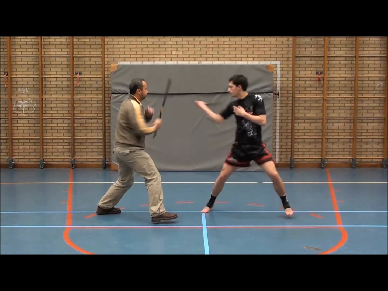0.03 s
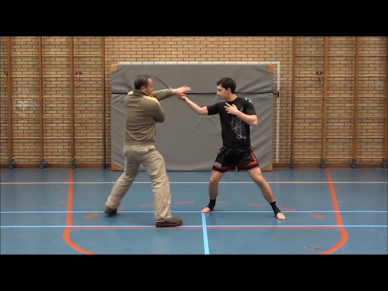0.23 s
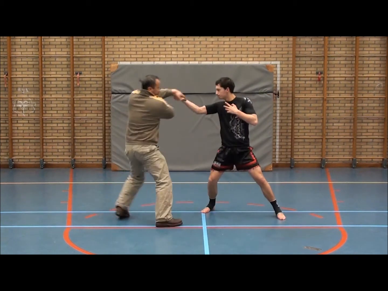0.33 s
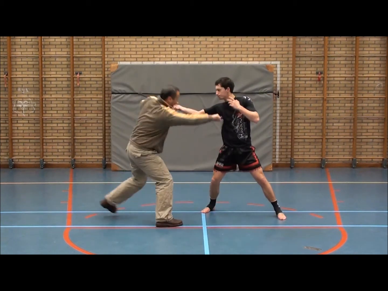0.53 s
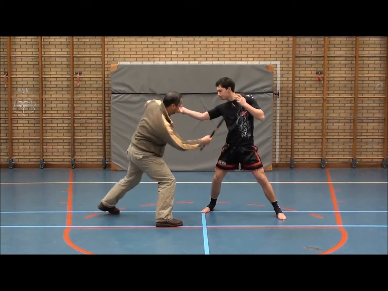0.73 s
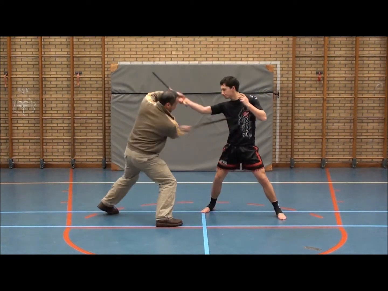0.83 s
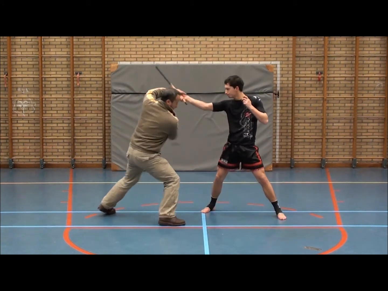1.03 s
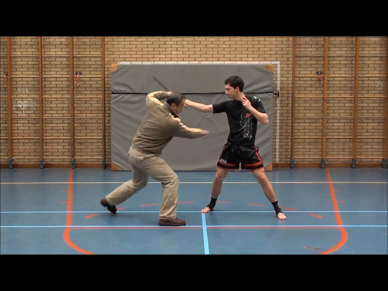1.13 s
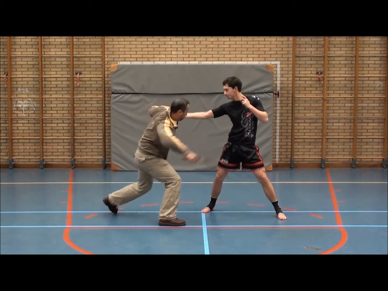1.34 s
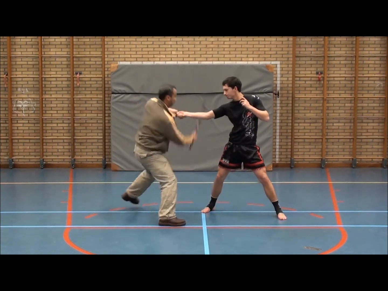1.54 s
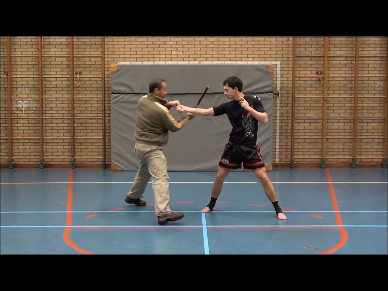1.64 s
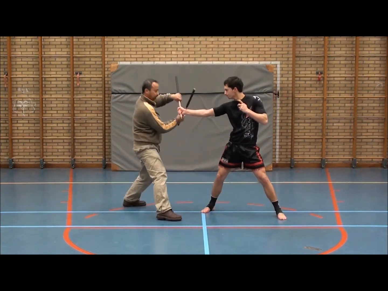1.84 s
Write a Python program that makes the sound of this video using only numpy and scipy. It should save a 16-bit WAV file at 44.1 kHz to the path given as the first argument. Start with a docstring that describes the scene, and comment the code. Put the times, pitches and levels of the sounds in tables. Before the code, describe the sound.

A very loud double crack of wooden sticks comes early, ringing in a large reverberant sports hall, followed by three softer slaps on arm and body, footfalls, cloth rustle and faint swishes, heard from some distance.

```python
"""In a large sports hall, two people spar with short wooden sticks.
The sticks clash once, very loudly, with a rebound: a contact impulse shaped by a crack and the wood's resonances.
Lighter slaps on arm and body follow, between footfalls on the sprung floor, the rustle of clothes and
the rush of swung sticks: shaped contact bursts and swelling noise. Steady ventilation noise lies beneath.
The hall rings for over a second, and a limiter flattens the start of the clash."""
import sys
import numpy as np
from scipy import signal
from scipy.fft import rfft, irfft, next_fast_len
from scipy.io import wavfile
from scipy.ndimage import uniform_filter1d, minimum_filter1d, map_coordinates

SR = 44100
rng = np.random.default_rng(int(sys.argv[2]) if len(sys.argv) > 2 else 0)


def wrap_up_sound(samples):
    """Save the sound to the file named by the first command line argument, as 16-bit audio."""
    columns = np.atleast_2d(samples).T
    # keep every value between -1 and 1, then stretch to whole-number steps
    tamed = np.clip(columns, -1, 1)
    steps = np.round(tamed * 32767).astype(np.int16)
    wavfile.write(sys.argv[1], SR, steps)


N = 83790
T = np.arange(N) / SR
M = next_fast_len(2 * N)  # transform length, padded against wrap-around
HZ = np.fft.rfftfreq(M, 1 / SR)


def amp(db):
    """Level law: decibels to amplitude gain."""
    return 10 ** (np.asarray(db) / 20)


def unit(x):
    """Normalization: scale to an rms of 1."""
    return x / np.sqrt(np.mean(x ** 2) + 1e-20)


def along(points, hz):
    """Interpolate (freq_hz, value) points linearly on a logarithmic frequency axis."""
    f, v = np.transpose(points)
    return np.interp(np.log(hz + 1), np.log(f + 1), v)


def filtered(x, response):
    """Linear filtering: multiply the spectrum of x by a frequency response."""
    return irfft(rfft(x, M) * response, M)[..., :N]


def colour(*parts):
    """Minimum phase: a causal response from (spectrum, gain_db) parts added in power, by cepstral folding."""
    power = sum(amp(along(points, HZ) + db) ** 2 for points, db in parts)
    cepstrum = irfft(np.log(power + 1e-14) / 2, M)
    cepstrum[1:M // 2] *= 2
    cepstrum[M // 2 + 1:] = 0
    return np.exp(rfft(cepstrum))


def delayed(x, s):
    """Shift theorem: a linear phase delays x by s seconds, to the nearest sample."""
    return filtered(x, np.exp(-2j * np.pi * HZ * round(s * SR) / SR))


def hump(hz, octaves):
    """Broad resonance: a level curve about 4 dB down at the given octaves from its centre."""
    away = np.log2(np.maximum(HZ, 1) / hz) / (2 * octaves)
    return np.transpose([HZ, -2 * 20 * np.log10(1 + away ** 2)])


def swell(s, width_s, db):
    """Gaussian envelope: peak at s, standard deviation width_s, peak level db."""
    return amp(db) * np.exp(-((T - s) / width_s) ** 2 / 2)


def diffuse():
    """Diffuse field: white stereo noise whose left-right coherence depends on frequency."""
    # coherence of two close microphones: freq_hz, likeness (0 to 1)
    likeness = [(60, .997), (250, 0.99), (500, 0.93), (1000, 0.88), (2500, 0.9), (5000, 0.86), (9000, 0.97)]
    # with mid as cos(turn) and side as sin(turn), the coherence is cos(2 turn)
    turn = np.arccos(np.clip(along(likeness, HZ), 0, 1)) / 2
    mid, side = filtered(rng.standard_normal((2, N)), np.array([np.cos(turn), np.sin(turn)]))
    return np.array([mid + side, mid - side])


def rush(spectrum):
    """Coloured noise: a stereo diffuse field of rms 1 with the given spectrum."""
    return unit(filtered(diffuse(), amp(along(spectrum, HZ))))


def burst(length_s):
    """Impulsive contact: dying noise with its spectrum made even, scaled to unit energy."""
    t = T[:SR // 4]
    noise = rng.standard_normal(len(t)) * np.exp(-t / length_s)
    spectrum = rfft(noise, 2 * len(t))
    even = irfft(spectrum / (abs(spectrum) + 1e-12))[:len(t)]
    x = even * np.exp(-(t / (4 * length_s)) ** 2)
    return x / np.linalg.norm(x)


def in_hall(contact_s, wet_db, echo_db):
    """Room acoustics: direct sound, discrete reflections, then an exponentially decaying diffuse tail."""
    # reverberation time: freq_hz, t60_s
    decay_times = [(100, 0.65), (400, 1.12), (1500, 1.286), (2500, 1.103), (4200, 0.96), (6000, 0.82),
                   (8000, 0.6), (11000, 0.35), (15000, 0.29)]
    # echoes off the ceiling and walls: delay_s, level_db (before echo_db is added)
    hall_echoes = [(0.0118, -16), (0.0214, -1), (0.0258, -4), (0.036, -2)]
    bounce_s, bounce_db = .0021, 2  # reflection off the floor
    gap_s, build_s = 0.0034, 0.013  # quiet before the tail, time constant of its rise

    hz, t, bands = signal.stft(diffuse(), SR, nperseg=256)
    decay = amp(-60 * t / along(decay_times, hz)[:, None])
    tail = signal.istft(bands * decay, SR, nperseg=256)[1][:, :N]
    tail = tail * (1 - np.exp(-np.maximum(T - gap_s, 0) / build_s))

    paths = [(0, 0), (bounce_s, bounce_db)]
    paths += [(s, db + echo_db) for s, db in hall_echoes]
    early = sum(amp(db) * np.pad(burst(contact_s), (round(s * SR), N))[:N] for s, db in paths)
    return early + amp(wet_db) * tail / np.linalg.norm(tail[0])


def air(level_db=-45.5):
    """Stationary noise: ventilation and hiss with a fixed spectrum."""
    # relative spectrum: freq_hz, level_db
    air_curve = [(25, -0.5), (60, -5.5), (120, 1), (250, 1), (500, 0.5), (1000, -8.5), (2000, -11),
                 (4000, -15.5), (8000, -10.5), (11000, -19), (16000, -19.5)]
    return amp(level_db) * rush(air_curve)


def clothes(grain_db=3, grain_rate_hz=400):
    """Stick-slip friction: cloth and shoes rub in small catches, noise with a randomly grained level."""
    # rubs: peak_s, width_s, level_db
    rubs = [(.02, 0.024, -40.5), (.15, 0.055, -38.5), (.78, 0.076, -37), (1.82, 0.15, -42.5)]
    # relative spectrum of the rubbing: freq_hz, level_db
    cloth_curve = [(200, -6.5), (1500, 0.5), (2800, -1), (4800, -0.5), (8000, -1.5), (10500, -15),
                   (16000, -18)]
    grain = map_coordinates(rng.standard_normal(N), [T * grain_rate_hz], order=1)
    envelope = sum(swell(*row) for row in rubs)
    return envelope * unit(amp(grain_db * grain)) * rush(cloth_curve)


def feet(level_db=10):
    """Forced vibration: each rolling foot makes the sprung floor boom, while the sole ticks."""
    # footfalls: start_s, level_db (before the common gain), tick_db (sole), roll_s, deep_db (boom), hall_db
    footfalls = [(0.1176, -9.5, -21, 0.0063, -25, -9), (.131, -9, -35, 0.027, 1.5, -3.5),
                 (0.162, -15.5, -33, 0.011, 3, -16), (.181, -13.5, -44, 0.011, 3, -16),
                 (.195, -16, -31, 0.011, 7.5, -11), (.402, -14.5, -34, .015, -5, -1),
                 (.744, -17, -22, 0.027, -2, 2.5), (.813, -20, -32, .02, -3, -2),
                 (1.167, -20, -19.5, 0.011, -11, -3), (1.716, -13, -34, 0.0068, -9, 1),
                 (1.83, -20.5, -18.5, 0.013, 2.5, 3.5)]
    # relative response of the sprung floor: freq_hz, level_db
    floor_curve = [(30, -25), (100, -7), (150, 5), (215, 15.5), (330, 5), (480, -6), (900, -18.5),
                   (3000, -24)]
    # the floor's deep boom under full weight: freq_hz, level_db (before deep_db is added)
    deep_curve = [(20, -25), (35, 8), (62, 8), (90, 5), (130, 8), (200, -10), (500, -35), (2000, -70)]
    # relative spectrum of the sole's tick: freq_hz, level_db
    sole_curve = [(300, -6), (1500, -3), (4000, 12.5), (8000, 8.5), (11000, 2), (16000, -22)]
    sole_lag_s = 0.0057  # the sole lands after the heel
    out = np.zeros((2, N))
    for s, db, tick_db, roll_s, deep_db, hall_db in footfalls:
        roll = in_hall(contact_s=roll_s / 2, wet_db=hall_db, echo_db=hall_db - 1.5)
        boom = filtered(roll, colour((floor_curve, 0), (deep_curve, deep_db)))
        tap = in_hall(contact_s=0.00023, wet_db=1.5, echo_db=1)
        tick = amp(tick_db) * filtered(tap, amp(along(sole_curve, HZ)))
        out += amp(db + level_db) * (delayed(boom, s) + delayed(tick, s + sole_lag_s))
    return out


def wood(ring_db=-0.5):
    """Modal resonance: the sticks' modes added in power as a spectrum of freq_hz, level_db."""
    # modes: freq_hz, width_hz (offset at which a mode is 7 dB down), level_db (before ring_db is added)
    modes = [(1200, 120, -5.5), (1630, 220, 0.5), (2055, 270, -0.5), (2306, 180, 1.5), (2704, 130, -3),
             (2998, 180, 4), (3630, 190, 1), (4166, 220, 4.5), (4410, 160, 0), (4830, 410, -0.5),
             (5640, 115, -0.5), (6000, 140, 0), (6550, 180, -13.5), (7500, 520, -5.5)]
    power = sum(amp(db) ** 2 / (1 + (1.114 * (HZ - hz) / width) ** 2) ** 2 for hz, width, db in modes)
    return np.transpose([HZ, 10 * np.log10(power) + ring_db])


def sticks(level_db=17):
    """Impact excitation: the clash and its rebound are each a crack and a short ring of the wood."""
    # contacts of stick on stick: start_s, level_db (before the common gain)
    contacts = [(0.2306, -0.5), (0.2415, 0.5)]
    # relative spectrum of the contact's crack: freq_hz, level_db
    crack_curve = [(60, -27), (250, -28), (460, -13.5), (900, -16.5), (1500, -18), (3000, -2), (5000, -7),
                   (7800, -8), (10000, -21), (13000, -37), (16000, -35)]
    tone = colour((crack_curve, 0), (wood(), 0))
    out = np.zeros((2, N))
    for s, db in contacts:
        hit = filtered(in_hall(contact_s=0.00088, wet_db=15, echo_db=-1.5), tone)
        out += amp(db + level_db) * delayed(hit, s)
    return out


def slaps(level_db=9):
    """Damped impact: soft contacts excite a body thud, a skin smack, a cloth snap and a damped stick ring."""
    # slaps of stick and hand on arm and body: start_s, level_db (before the common gain), contact_s,
    # thud_db (before the thud's own gain), thud_hz, smack_db, snap_db, ring_db (stick), hall_db
    hits = [(.6280, -12.5, 0.00061, -3, 135, -1, 7.5, -22, 3),
            (0.9387, -8, 0.0019, -4.5, 227, -4, -0.5, 0.5, 5),
            (1.2981, -9.5, 0.0019, 0.5, 201, 6, -2, -8, 5.5)]
    # spectrum of the skin's smack: freq_hz, level_db (before smack_db is added)
    smack_curve = [(100, -45), (520, 3.5), (850, -0.5), (1100, 3), (1350, -2), (1570, 3.5), (1950, -2),
                   (2700, -3.5), (4500, -6.5), (8000, -7), (15000, -26)]
    # spectrum of the cloth's snap: freq_hz, level_db (before snap_db is added)
    snap_curve = [(500, -17), (2500, -6), (5000, -1.5), (7500, 2), (9300, -3), (11000, -19), (13000, -19),
                  (16000, -30)]
    thud_gain_db, thud_octaves = 13.5, 0.6  # height and spread of the body's low resonance
    out, stick = np.zeros((2, N)), wood()
    for s, db, contact_s, thud_db, thud_hz, smack_db, snap_db, ring_db, hall_db in hits:
        thud = hump(thud_hz, thud_octaves)
        tone = colour((thud, thud_gain_db + thud_db), (smack_curve, smack_db),
                      (snap_curve, snap_db), (stick, ring_db))
        hit = filtered(in_hall(contact_s, wet_db=hall_db, echo_db=-2.5), tone)
        out += amp(db + level_db) * delayed(hit, s)
    return out


def swings(spread_octaves=0.36):
    """Aerodynamic noise: swung sticks push the air, a swell of noise around a pitch."""
    # swings: peak_s, width_s, level_db, pitch_hz
    strokes = [(1.02, 0.015, -40, 350), (1.19, 0.027, -44, 353), (1.671, 0.075, -52, 482),
               (1.88, 0.039, -40, 530)]
    return sum(swell(s, width, db) * rush(hump(hz, spread_octaves)) for s, width, db, hz in strokes)


def scene(left_db=0.18):
    """Superposition: the sparring, a little to the left, adds to the hall's steady air."""
    sparring = clothes() + feet() + sticks() + slaps() + swings()
    return sparring * amp([[left_db], [-left_db]]) + air()


def record(dry):
    """Dynamic range control: a look-ahead limiter with a steady release, then a band limit."""
    ceiling_db, release_db_per_s = 0.14, 61
    lookahead_s, attack_s = 0.013, 0.0072
    top_hz = 16000
    over_db = np.maximum(20 * np.log10(abs(dry).max(axis=0) + 1e-9) - ceiling_db, 0)
    # the running maximum on a rising ramp lets each cut fall back at the release rate
    ramp_db = release_db_per_s * T
    cut_db = np.maximum.accumulate(over_db + ramp_db) - ramp_db
    held = minimum_filter1d(amp(-cut_db), 2 * round(lookahead_s * SR) + 1)
    gain = uniform_filter1d(held, round(attack_s * SR) + 1)
    return filtered(dry * gain, HZ < top_hz)


dry = scene()
out = record(dry)
wrap_up_sound(out)
```